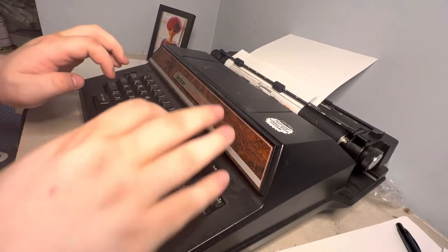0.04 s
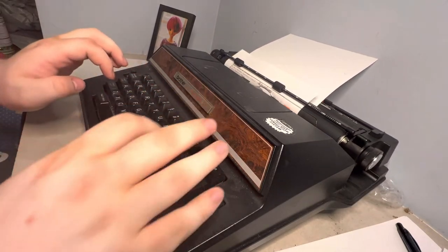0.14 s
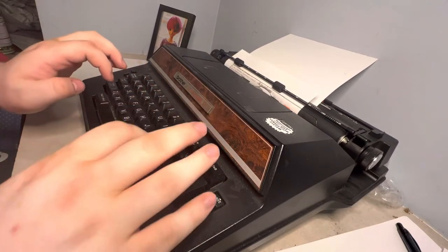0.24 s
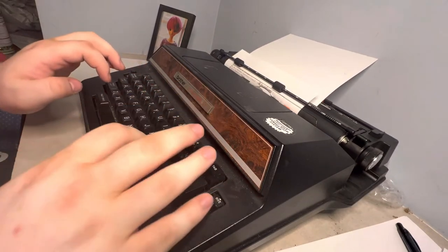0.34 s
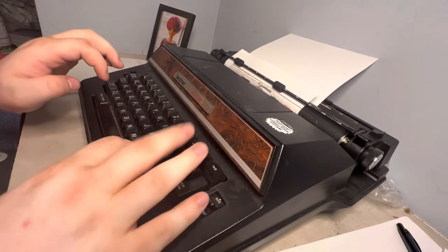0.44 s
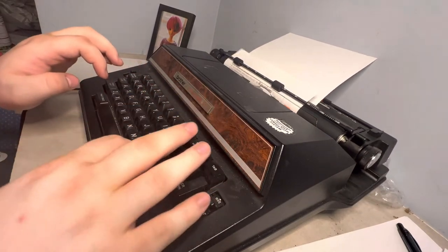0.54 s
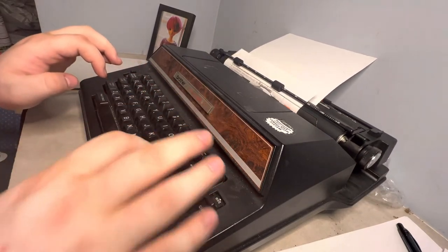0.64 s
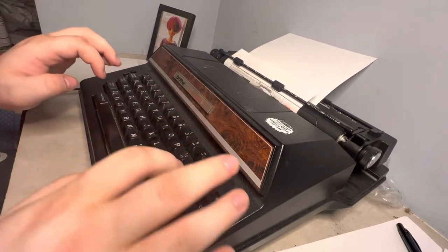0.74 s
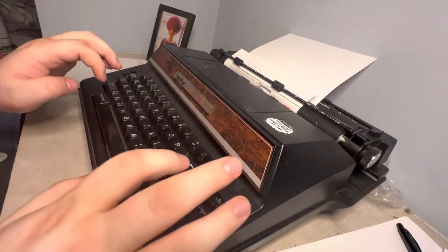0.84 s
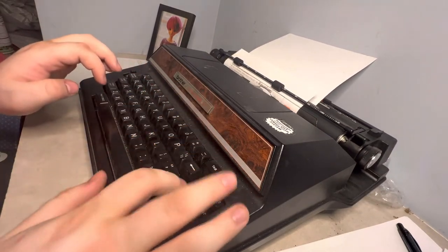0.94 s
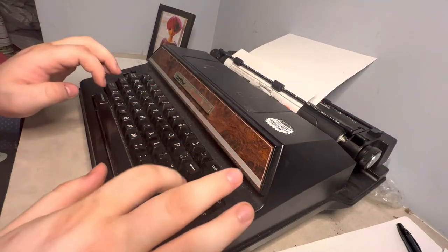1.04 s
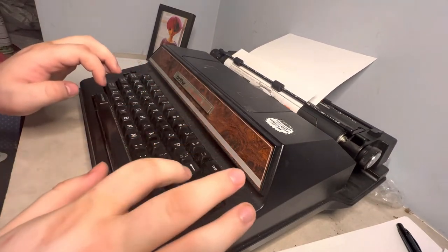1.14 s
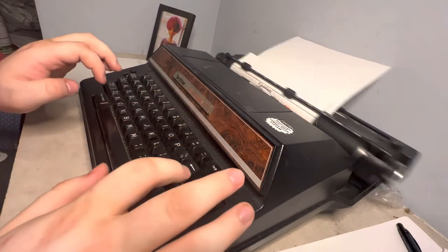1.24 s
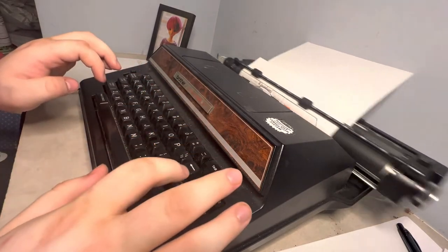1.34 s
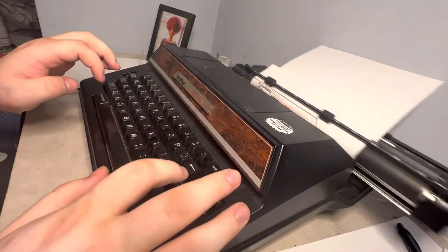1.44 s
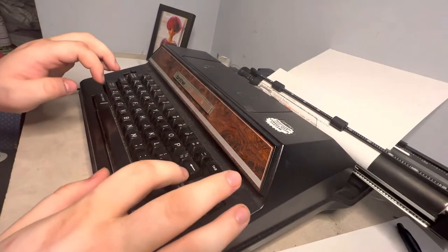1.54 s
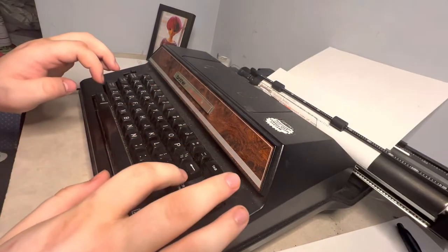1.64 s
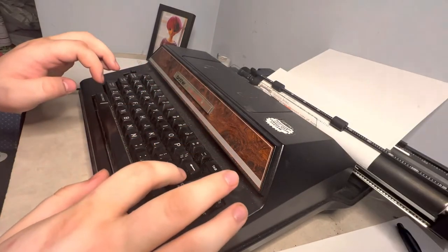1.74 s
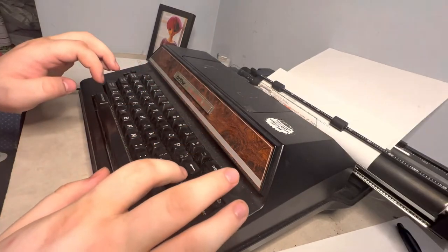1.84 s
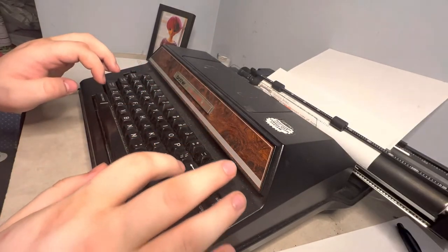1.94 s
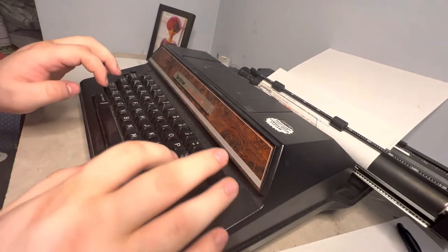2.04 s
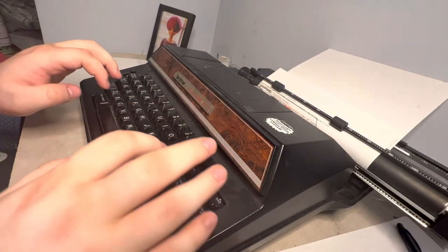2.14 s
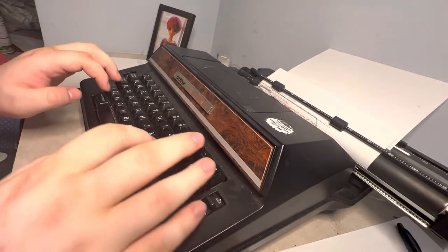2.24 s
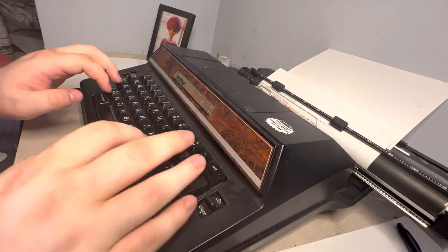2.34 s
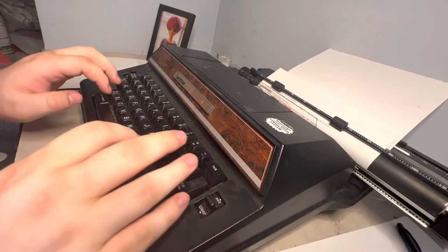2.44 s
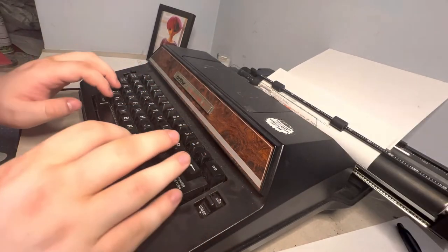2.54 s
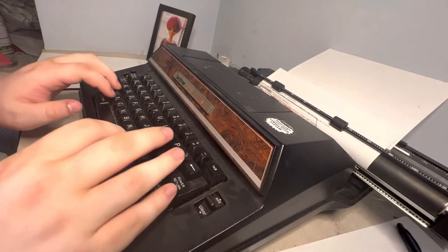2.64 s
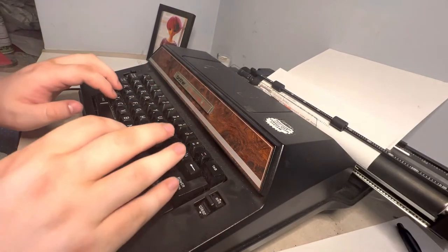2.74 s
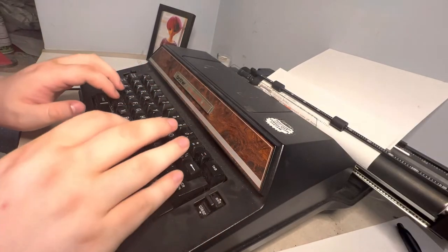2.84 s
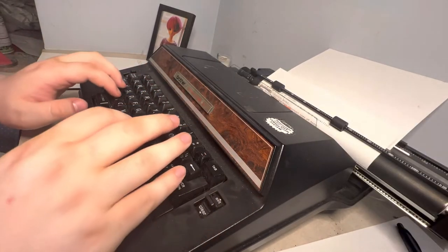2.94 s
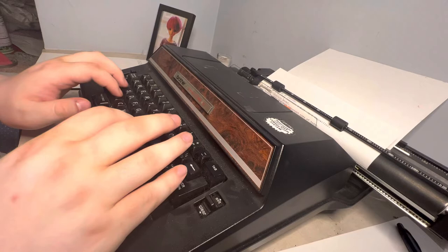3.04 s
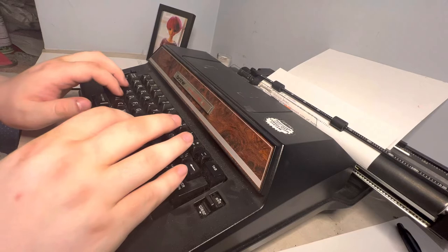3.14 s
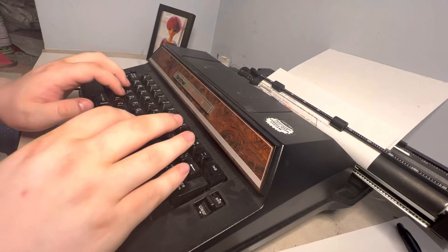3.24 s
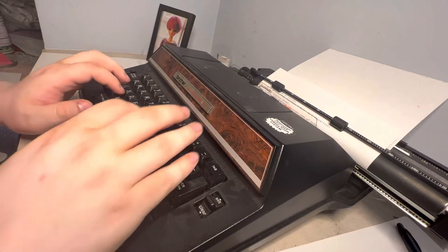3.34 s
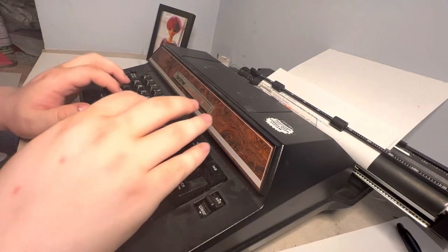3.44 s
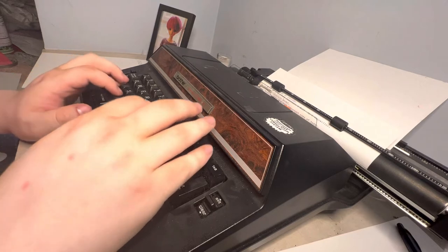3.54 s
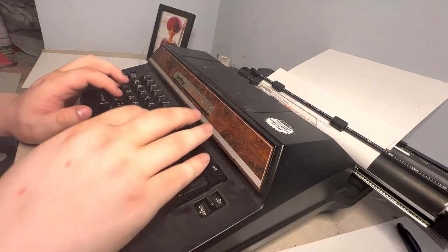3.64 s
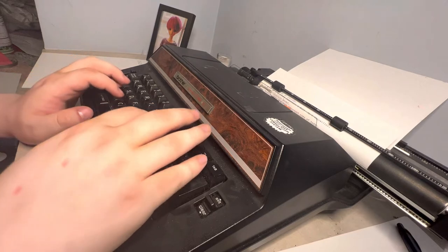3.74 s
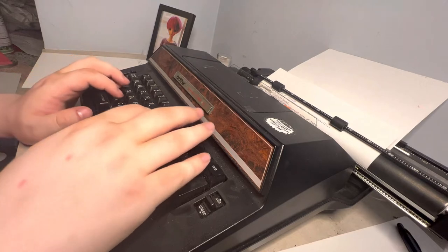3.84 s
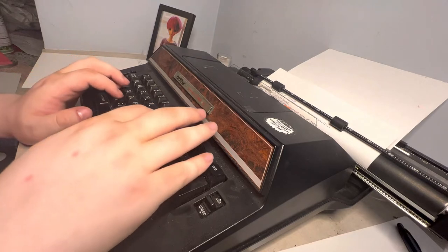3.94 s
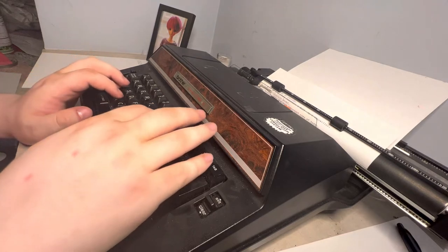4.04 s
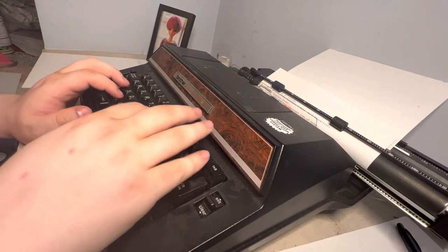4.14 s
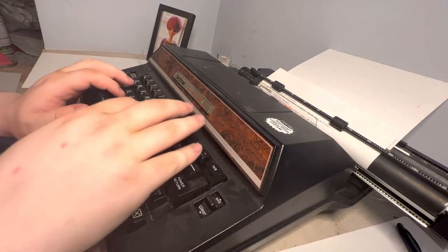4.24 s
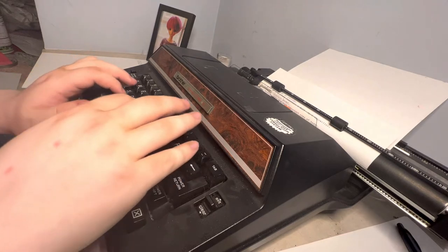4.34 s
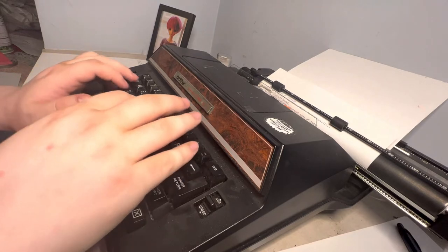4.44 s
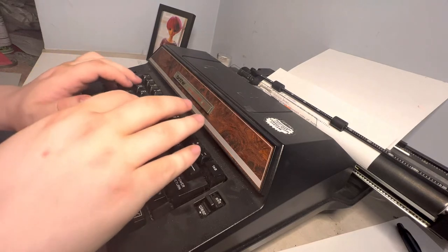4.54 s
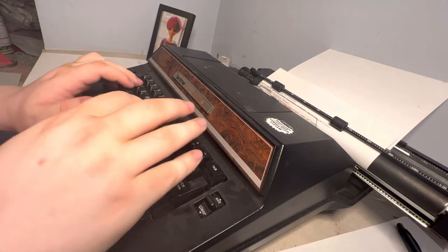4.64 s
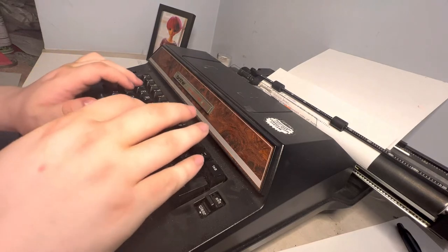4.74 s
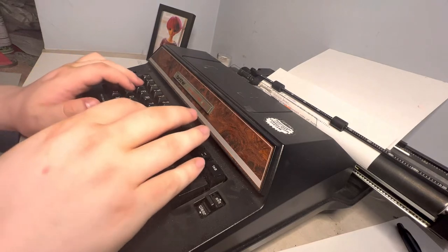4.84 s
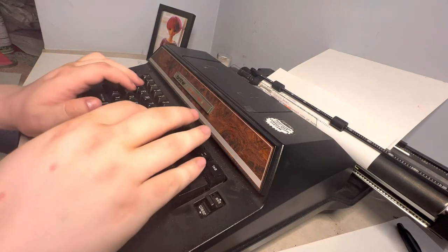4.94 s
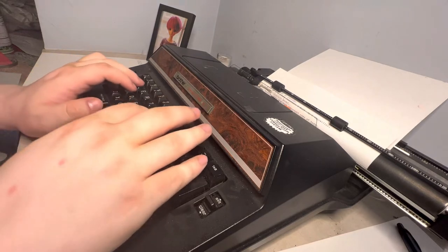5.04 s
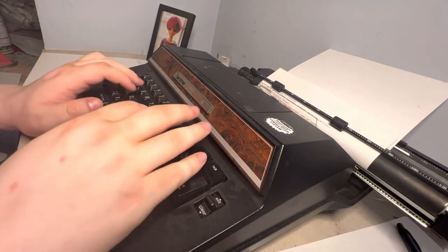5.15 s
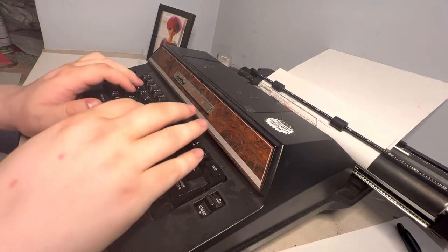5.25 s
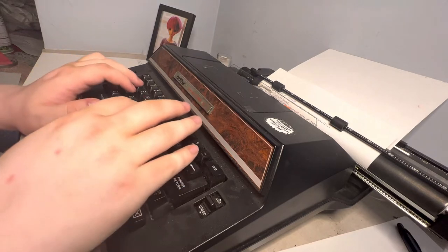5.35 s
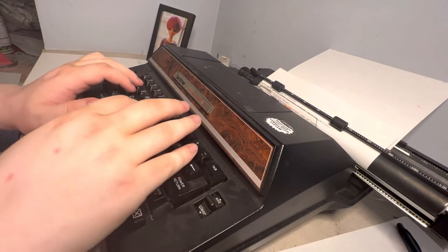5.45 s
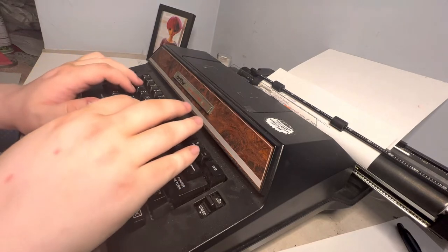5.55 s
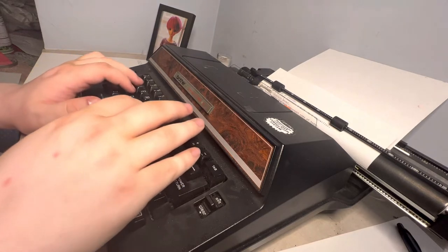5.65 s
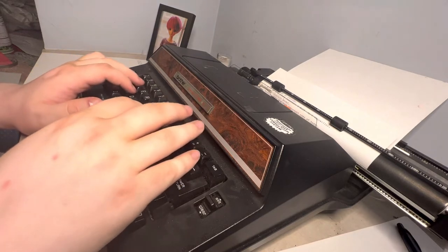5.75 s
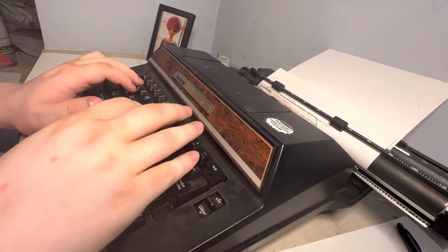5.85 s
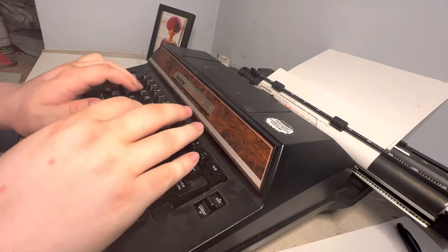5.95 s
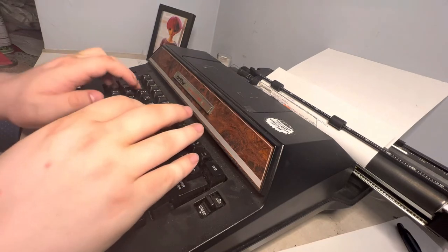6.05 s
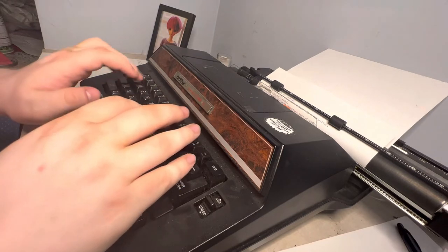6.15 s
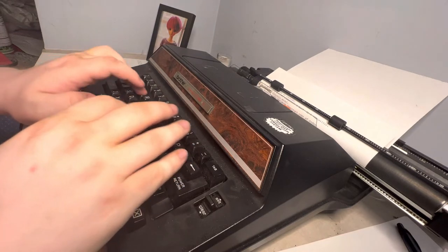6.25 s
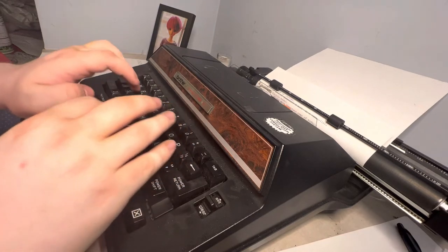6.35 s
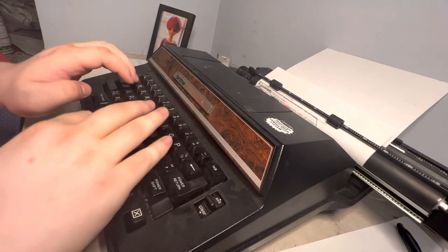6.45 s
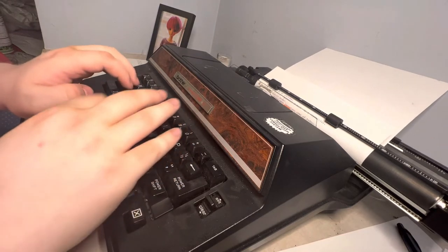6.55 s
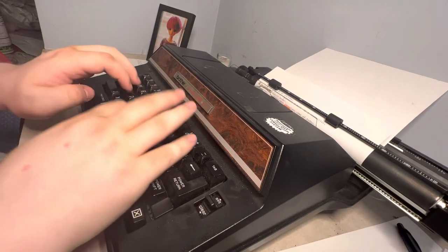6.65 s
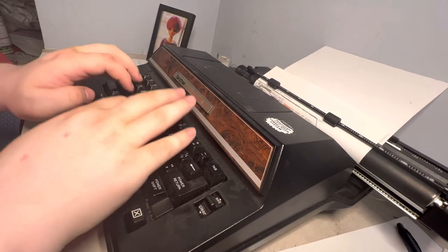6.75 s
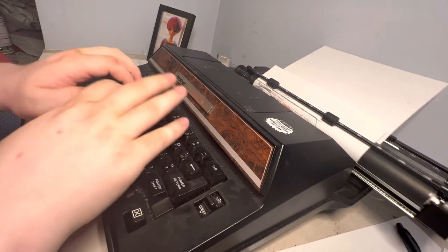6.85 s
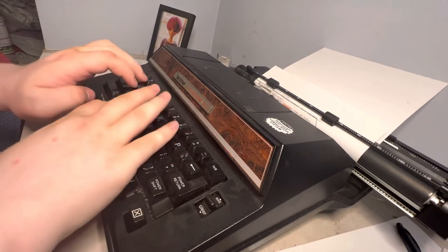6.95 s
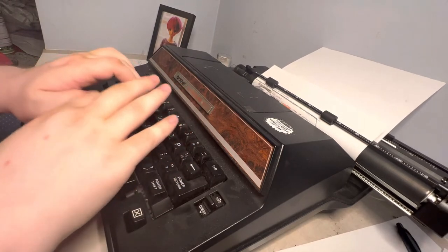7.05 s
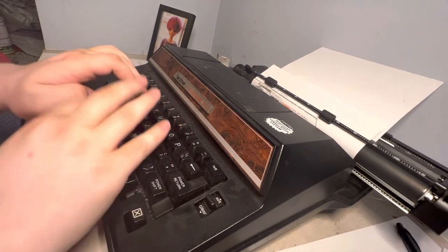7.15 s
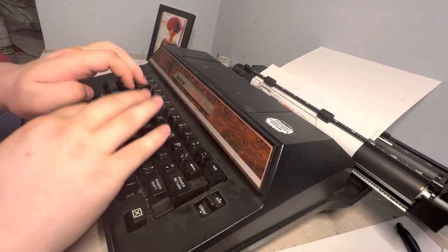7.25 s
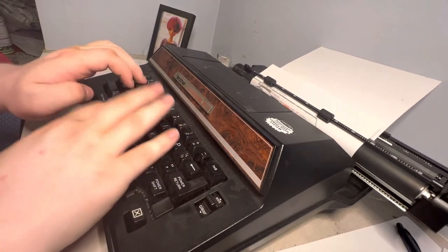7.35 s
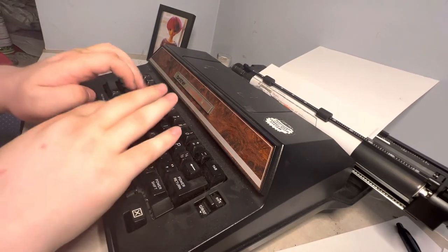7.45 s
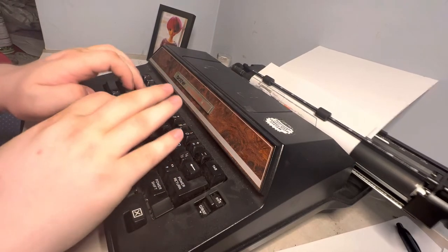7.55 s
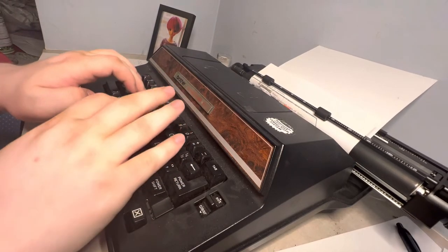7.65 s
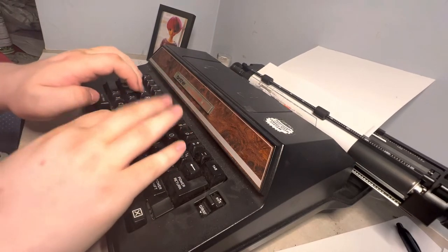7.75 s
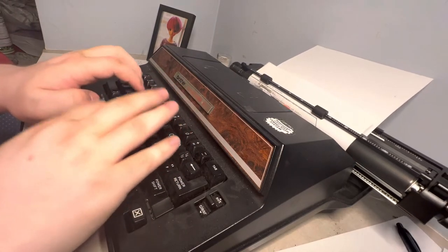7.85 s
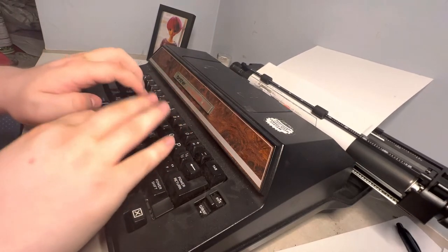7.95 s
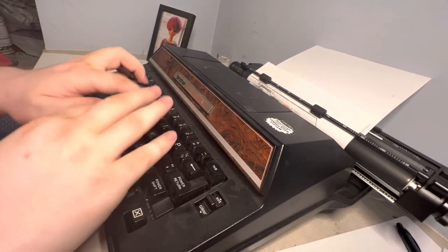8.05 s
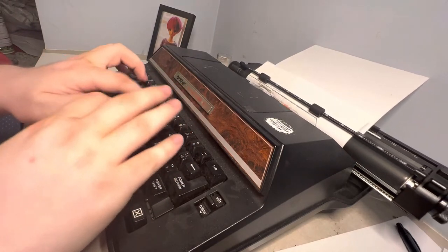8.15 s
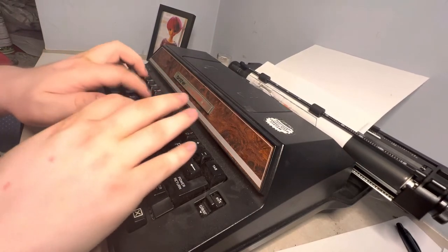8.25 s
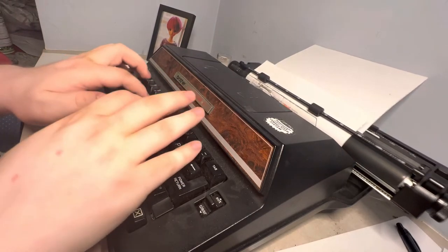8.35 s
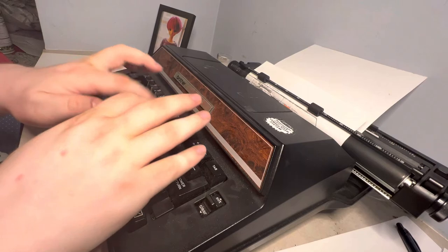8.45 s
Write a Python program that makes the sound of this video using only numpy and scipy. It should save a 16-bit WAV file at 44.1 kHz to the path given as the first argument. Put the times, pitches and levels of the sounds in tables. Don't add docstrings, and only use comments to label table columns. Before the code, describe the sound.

An electric typewriter on a desk in a small room, heard very close in stereo. Its motor hums low and throbbing throughout. One sharp key clack and rattle comes first, then a small ping and a short carriage slide ending in a hard slam. A lone clack follows, a long stretch of hum alone, then a fast uneven run of crisp, metallic letter strikes with desk thumps.

```python
import sys
import numpy as np
from scipy import signal
from scipy.fft import rfft, irfft, next_fast_len
from scipy.io import wavfile
from scipy.ndimage import uniform_filter1d, minimum_filter1d, map_coordinates

SR = 44100
rng = np.random.default_rng(int(sys.argv[2]) if len(sys.argv) > 2 else 0)


def amp(db):
    return 10 ** (np.asarray(db, float) / 20)


def write(x):
    x = np.atleast_2d(x).T
    wavfile.write(sys.argv[1], SR, np.round(np.clip(x, -1, 1) * 32767).astype(np.int16))


N = 375291
T = np.arange(N) / SR


def unit(x):
    return x / np.sqrt(np.mean(x ** 2) + 1e-20)


def along(points, hz):
    f, v = np.transpose(points)
    return np.interp(np.log(hz + 1), np.log(f + 1), v)


def filtered(x, response):
    m = next_fast_len(N + SR // 4)
    return irfft(rfft(x, m) * response(np.fft.rfftfreq(m, 1 / SR)), m)[..., :N]


def body(modes):
    def response(f):
        shape = 0
        for k, (centre, width, db) in enumerate(modes):
            resonance = 1j * f * width / (centre * centre - f * f + 1j * f * width)
            shape = shape + (-1) ** k * amp(db) * resonance
        return shape / np.sqrt(np.mean(abs(shape) ** 2))
    return response


def ringing(modes, t):
    return np.array([amp(db) * np.sin(2 * np.pi * centre * t) * np.exp(-np.pi * width * t)
                     for centre, width, db in modes])


def wobble(rate):
    coarse = T[::8]
    knots = rng.standard_normal(int(N * rate / SR) + 4)
    return np.interp(T, coarse, map_coordinates(knots, [coarse * rate]))


def noise():
    return rng.standard_normal((2, N))


def even(x, span):
    return x / np.sqrt(abs(uniform_filter1d(np.mean(x ** 2, 0), round(span * SR))) + 1e-20)


def clumped(x, depth_db):
    z = signal.stft(x, nperseg=256)[2]
    field = rng.standard_normal(z.shape[1:])
    field = uniform_filter1d(uniform_filter1d(field, size=3, axis=0), size=4, axis=1)
    gain = amp(depth_db * unit(field))
    return signal.istft(z * unit(gain), nperseg=256)[1][:, :N]


def pings(rows, rise, vary):
    out = np.zeros((2, N + SR))
    t = np.arange(round(max(row[2] for row in rows) * SR)) / SR
    luck = rng.standard_normal((len(rows), 4))
    for (s, hz, t60, db), (detune, size, turn, start) in zip(rows, luck):
        phase = 2 * np.pi * hz * (1 + vary / 100 * detune) * t + start + np.c_[[0, turn]]
        level = amp(db + 2 * vary * size - 60 * t / t60) * (1 - np.exp(-t / rise))
        out[:, round(s * SR):][:, :len(t)] += level * np.sin(phase)
    return out[:, :N]


SHAFT_HZ, MAINS_HZ, BELT_HZ = 57.64, 120, 68.65
MAINS_IN_STEP_S, BELT_IN_STEP_S = 4.62, 4.525
WHIRR_DB = -60.5
# order, level_db
SHAFT_ORDERS = [(1, -50), (3, -62.5), (6, -58)]
# freq_hz, level_db (per Hz)
WHIRR_CURVE = [(20, -38), (40, -10.5), (123, 2.5), (170, -19), (285, -16.5), (405, -19), (900, -19.5),
               (1700, -26.5), (1950, -27.5), (3500, -37.5), (5300, -45.5), (9800, -46), (14000, -54.5),
               (16000, -81.5)]
# centre_hz, width_hz, level_db
BEARING_MODES = [(218, 14, 8), (498, 43, -0.5), (663, 13, 0.5), (750, 13, 1.5), (926, 60, 2),
                 (1169, 15, 1.5), (1432, 61, -2.5), (1673, 27, -3.5), (6900, 460, -26)]
# time_s, hum_rise_db, rail_slide_db
RETURN_LOAD = [(1.14, -7, -102), (1.19, 4.5, -34.5), (1.25, 5, -44.5), (1.382, 14, -48),
               (1.44, -7.5, -52.5), (1.47, 10, -47), (1.52, 13.5, -47), (1.6, -4, -96.5)]


def motor():
    def turn(hz, s):
        return np.exp(2j * np.pi * hz * (T - s))

    s, rise_db, _ = np.transpose(RETURN_LOAD)
    hum = sum(amp(db + 2.8 * wobble(22)) * turn(k * SHAFT_HZ, 0) * np.exp(.2j * wobble(7.6))
              for k, db in SHAFT_ORDERS)
    throb = amp(-45.5) + amp(-45.5) * turn(MAINS_HZ - 2 * SHAFT_HZ, MAINS_IN_STEP_S)
    hum += amp(np.interp(T, s, rise_db) + 1.4 * wobble(28)) * throb * turn(2 * SHAFT_HZ, 0)
    hum += amp(-62.0) * turn(SHAFT_HZ, 0) * turn(BELT_HZ - SHAFT_HZ, BELT_IN_STEP_S)
    hum += amp(-68.5 + wobble(8)) * turn(2 * MAINS_HZ, 0)
    whirr = filtered(amp(1.3 * wobble(60)) * noise(), lambda f: amp(along(WHIRR_CURVE, f)))
    whine = filtered(noise(), lambda f: body(BEARING_MODES)(f) * (f < 8000))
    drift_db = .8 * wobble(6)
    hum_pair = np.sqrt(2) * np.array([hum.real, hum.imag])
    return hum_pair + amp(WHIRR_DB + 8.0 + drift_db) * unit(whirr) + amp(WHIRR_DB + 3.0) * unit(whine)


# time_s, level_db
STIR_LEVEL = [(0, -100), (1.2, -60), (1.85, -78), (2.5, -79.5), (2.9, -71.5), (3.3, -78), (4.6, -76.5),
              (4.8, -70), (5.2, -79.5)]
# freq_hz, level_db (per Hz)
STIR_CURVE = [(2500, -42), (4500, -9), (7000, -2.5), (10000, -8.5), (14000, -20.5), (16000, -20.5)]


def stirring():
    rustle = unit(filtered(noise(), lambda f: amp(along(STIR_CURVE, f))))
    tick_s, tick_db, tick_t60 = 4.652, -52, .05
    fade = (T > tick_s) * amp(tick_db - 60 * abs(T - tick_s) / tick_t60)
    tick = fade * unit(filtered(noise(), body([(14000, 1500, 0)])))
    level_db = np.interp(T, *np.transpose(STIR_LEVEL)) + 1.5 * wobble(14) + 1.2 * wobble(6)
    return amp(level_db) * rustle + tick


# trip_s, level_db, spring_db, touch_before_s, touch_db
KEY_TRIPS = [(0.4575, -15.5, -5.5, .012, -27), (3.0136, -16, -3, 0.019, -43),
             (5.8993, -19.5, 1, 0.024, -30.5), (6.2172, -15.5, -3, 0.01, -19),
             (6.6686, -14, 2.5, .012, -23.5), (6.7818, -15.5, -0.5, 0.012, -38),
             (6.9271, -11.5, 1.5, 0.01, -22.5), (7.0603, -14.5, -27, 0.013, -21),
             (7.3682, -12, 0, 0.0062, -28.5), (7.4859, -16.5, -1, 0.013, -25),
             (7.648, -18.5, -2, 0.0085, -17.5), (7.758, -11.5, -0.5, 0.0075, -37),
             (8.0875, -18, -2, 0.017, -18), (8.2828, -16.5, 1.5, 0.0098, -30),
             (8.4862, -17, 2.5, 0.011, -30.5)]
# landing_s, flight_s, cam_db, landing_db, slap_db
TYPED_LETTERS = [(5.95, .032, -9, -18.5, 1.5), (6.2728, .034, -11, -13.5, -3),
                 (6.7277, .032, -11.5, -14, -2), (6.8381, .0335, -8.5, -14, 0), (6.987, .035, -13, -10, 0),
                 (7.1146, .0335, -10, -15, 0.5), (7.428, 0.035, -12.5, -14, 2.5),
                 (7.5407, 0.036, -10.5, -19.5, 0.5), (7.7024, .0335, -10.5, -15, 2.5),
                 (7.8167, .031, -10, -23, -2.5), (8.1367, .033, -11.5, -13.5, -4),
                 (8.343, 0.036, -10, -15, -5.5)]
# delay_s (negative is before), level_db, spring_db, platen_db, snap_db
LETTER_STEPS = [
    (-.011, -19, 0, -1, -12),
    (0, -26, -12, 9, -25),
    (.012, -21.5, -1, -9, -12.5),
    (.032, -19.5, 0, -5.5, -12),
    (.055, -39.5, -17, -9, -15.5),
]
# press_s, level_db
SPACE_BARS = [(6.426, -2), (7.177, -1.5), (7.945, -2)]
# delay_s (negative is before), level_db, spring_db, platen_db, snap_db
SPACE_STEPS = [(-.003, -25, -0.5, -5, -22), (.007, -26.5, -7, -1, -9), (.022, -23.5, 1.5, -3.5, -21),
               (.038, -30.5, -17, -4, -7.5), (0.062, -22, -5, -2.5, -16), (.095, -22.5, -10, -15, -11.5),
               (.139, -35, 1, 6, -12.5)]
# start_s, level_db, spring_db, platen_db, snap_db
RETURN_STEPS = [(0.94, -29.5, 10, 4.5, -25), (0.948, -41, -6.5, 7, -16), (0.959, -49, -22, 17, -7),
                (1.068, -27.5, 4.5, -7, -16), (1.1713, -43, -14, 3.5, -9), (1.192, -36.5, 8, 10, -11.5),
                (1.2175, -43.5, -11, 2, -19.5), (1.287, -34.5, -17, -1.5, -12),
                (1.396, -34.5, -7, -6.5, -22), (1.514, -12, 0, -5, -28), (1.5316, -13, -16, 1.5, -12),
                (1.5467, -20, -18, -9.5, 1), (1.564, -40, -22, -4.5, -9), (1.614, -26, -2.5, -4.5, -21.5)]
# start_s, level_db, spring_db, platen_db, snap_db
BASKET_STEPS = [(0.5275, -30, -13.5, 3.5, -19), (0.6092, -39.5, -3.5, -18, -11), (3.055, -38, -3, 6, -25),
                (3.0728, -17.5, -6.5, -6.5, -8.5), (3.078, -34.5, -11, -17, -17),
                (3.024, -19, -3, -24, -14.5), (3.031, -29, -7, -16, -16), (3.098, -49, -5, -7, -18),
                (3.001, -37, -11.5, 11.5, -21), (1.077, -44, -4, -9, -18), (1.206, -39, -5, 7, -21),
                (4.6512, -42, 3.5, -10, -22), (6.0766, -15.5, 5, -8, -28), (6.1235, -16.5, 2.5, 0.5, -9.5),
                (6.1384, -46, -23, -21, -21), (7.5335, -29, 8, 8, -10), (7.806, -24.5, 7, -6, -12),
                (8.163, -21.5, -16.5, -23, -0.5), (0.455, -27, 6, -15, -8.5), (.478, -18.5, -5, 1, -20.5),
                (.485, -14, -2, -9, -21), (0.514, -13, -3, -4.5, -19.5), (0.5441, -22, -3, -6, -19.5),
                (.5744, -30.5, -1, -7.5, -14.5), (3.009, -24, 6, -18, -24), (5.8912, -23.5, 1, 3, -22)]


def chain():
    touch = 0.85, -4, -29
    trip = -6, -27.5
    cam, landing = (-4.5, -7, -20.5), (-17.5, -6, -20)  # spring, platen and snap dB
    guide_s = .005
    rows = []
    for s, db, spring_db, before, touch_db in KEY_TRIPS:
        rows += [(s - before, touch_db, *touch), (s, db, spring_db, *trip)]
    for s, flight, cam_db, land_db, _ in TYPED_LETTERS:
        rows += [(s - flight, cam_db, *cam), (s - guide_s, land_db, *landing)]
        rows += [(s + later, *rest) for later, *rest in LETTER_STEPS]
    for s, db in SPACE_BARS:
        rows += [(s + later, db + step_db, *rest) for later, step_db, *rest in SPACE_STEPS]
    return rows + RETURN_STEPS + BASKET_STEPS


LAG = 75
SOFTER = .45
HOLD = 1.28
# centre_hz, width_hz, level_db
STEEL_MODES = [(3390, 420, -1.5), (3542, 110, -0.5), (4000, 270, -18), (4720, 60, -3), (5050, 47, -8.5),
               (5900, 83, -1.5), (6300, 150, -2), (7000, 110, -7.5), (5360, 2100, 4.5)]
# centre_hz, width_hz, level_db
SPRING_MODES = [(8060, 300, -0.5), (9120, 480, 5), (9860, 120, 1), (14030, 2800, -7), (8100, 920, -5.5)]
# centre_hz, width_hz, level_db
PLATEN_MODES = [(887, 45, 0), (1574, 230, 6), (1855, 190, -3), (2120, 95, -10.5), (2700, 21, -5.5),
                (1632, 2960, 7.5)]
# level_db, t60_s
ROOM_TAILS = [
    (-9, 0.17),
    (-10, 0.1),
    (-2.5, 0.17),
]


def contacts(rise, t60, scatter_db):
    parts, t = (STEEL_MODES, SPRING_MODES, PLATEN_MODES), np.arange(SR // 8) / SR
    rings = [ringing(modes, t) for modes in parts]
    drive, snaps = np.zeros((3, N + SR)), np.zeros((2, N + SR))
    rows = chain()
    luck = rng.standard_normal((len(rows), 3, 2, 2, 10))
    for (s, db, spring_db, platen_db, snap_db), chance in zip(rows, luck):
        levels, at = amp([db, db + spring_db, db + platen_db]), round(s * SR)
        onset = 1 - np.exp(-t / (rise * amp(-SOFTER * (db + 14.0))))
        burst = onset * amp(-60 * (t / t60) ** HOLD)
        drive[:, at:at + len(t)] += amp(-12.0) * levels[:, None] * burst
        for level, ring, (size, sign) in zip(levels, rings, chance):
            strength = (amp(scatter_db * np.tanh(size)) * np.sign(sign))[:, :len(ring)]
            snaps[:, at + LAG:at + LAG + len(t)] += level * amp(snap_db) * strength @ ring
    sound, chatter = snaps[:, :N], unit(amp(2.6 * wobble(540)))
    for d, modes, (tail_db, tail_t60) in zip(drive[:, :N], parts, ROOM_TAILS):
        keep = amp(-120 / (tail_t60 * SR))
        tail = np.sqrt(abs(signal.lfilter([1 - keep], [1, -keep], d ** 2)))
        direct = d * chatter * noise()
        room = amp(tail_db + 12.5) * tail * noise()
        sound = sound + filtered(direct + room, body(modes))
    return clumped(sound, depth_db=2.4)


# delay_s, pitch_hz, t60_s, level_db
KEY_RINGS = [(.002, 9420, .04, -26), (.003, 3690, .04, -37.5)]
# delay_s, pitch_hz, t60_s, level_db
CAM_RINGS = [(0.0009, 10000, 0.021, -21.5), (0.00031, 7600, .03, -23), (0.0046, 6800, 0.065, -23),
             (.001, 26000, .05, -23.5), (0.008, 5600, 0.013, -27), (0.0034, 1710, .08, -28.5)]
# delay_s, pitch_hz, t60_s, level_db
LANDING_RINGS = [(-.011, 9800, .04, -27.5), (-.005, 5050, 0.059, -23), (.002, 4856, 0.052, -23),
                 (.010, 1673, 0.043, -24), (.030, 4997, 0.062, -27), (.001, 2543, 0.0502, -28.5),
                 (.004, 941, .07, -31), (.031, 5580, 0.062, -29), (.055, 1555, 0.09, -35)]
# delay_s, pitch_hz, t60_s, level_db
SPACE_RINGS = [(0.026, 6880, .07, -31.5), (.062, 4940, 0.065, -28), (.066, 1630, .07, -37)]
# start_s, pitch_hz, t60_s, level_db
ONE_OFF_RINGS = [(6.0795, 6260, 0.041, -19.5), (6.0795, 7250, 0.051, -20.5), (6.0795, 9860, .022, -19),
                 (6.127, 1830, 0.071, -21), (6.127, 3755, 0.067, -22.5),
                 (.483, 5900, 0.051, -22), (.483, 1550, .05, -30.5), (0.514, 9668, 0.063, -28.5),
                (.514, 750, 0.13, -25), (.948, 4100, .05, -39), (.958, 2300, 0.15, -34.5),
                (.966, 866, 0.13, -31.5), (1.074, 6890, .05, -38), (1.076, 4630, 0.043, -36),
                (1.077, 5100, .04, -39), (1.057, 855, 0.065, -38), (1.225, 898, 0.11, -34),
                (1.453, 746, 0.13, -44), (1.08, 9300, .05, -32), (1.187, 980, .06, -42),
                (1.19, 3270, .03, -29), (1.196, 2400, .04, -35.5), (1.2, 1790, 0.057, -25.5),
                (1.212, 1500, 0.067, -28.5), (1.297, 1470, .09, -42), (1.355, 1500, 0.2, -43.5),
                (1.515, 8300, .05, -23.5), (1.516, 1570, 0.12, -21), (1.525, 8936, .05, -26.5),
                (1.53, 862, 0.13, -21), (1.616, 2310, 0.089, -35), (3.022, 8871, .05, -26.5),
                (3.016, 4600, 0.14, -29), (3.018, 1504, 0.047, -37), (3.036, 906, .05, -25.5),
                (6.085, 1370, 0.069, -30), (7.238, 5770, 0.069, -43)]


def part_rings():
    starts = [([k[0] for k in KEY_TRIPS], KEY_RINGS),
              ([s - flight for s, flight, *_ in TYPED_LETTERS], CAM_RINGS),
              ([k[0] for k in TYPED_LETTERS], LANDING_RINGS),
              ([k[0] for k in SPACE_BARS], SPACE_RINGS)]
    repeated = [(s + later, *rest) for times, table in starts for s in times for later, *rest in table]
    return pings(repeated, rise=0.002, vary=1.2) + pings(ONE_OFF_RINGS, rise=0.0017, vary=0)


# start_s, pitch_hz, t60_s, level_db
HARD_CLICKS = [(1.0722, 6300, .008, -28), (1.0775, 4900, .01, -25.5), (1.1915, 3000, .008, -28),
               (1.5475, 6000, .012, -10), (1.6155, 3450, .012, -29), (3.0152, 5200, .01, -21),
               (3.0248, 4607, 0.0087, -19.5), (3.0748, 4930, 0.0091, -21), (3.0795, 3610, .01, -18),
               (4.652, 7100, .03, -48), (2.886, 8500, .01, -55), (2.886, 12800, .008, -54),
               (6.0795, 10430, .012, -11.5), (6.0795, 8900, .015, -13.5), (6.127, 4000, .015, -20),
               (5.8978, 9300, .008, -14), (5.9222, 6610, .012, -12.5), (6.7345, 5126, .008, -18),
               (6.8092, 7000, .012, -15), (6.8505, 4990, .008, -15.5), (6.9282, 8530, .01, -12),
               (6.9552, 6900, .008, -15.5), (7.0155, 8860, .008, -17), (7.3705, 8370, 0.012, -10.5),
               (7.3995, 6790, .01, -16), (7.4385, 4860, .01, -12.5), (7.5128, 6520, 0.011, -13),
               (7.5335, 9820, .01, -14), (7.6745, 6300, 0.0084, -16.5), (7.7605, 8100, .01, -16.5),
               (7.786, 6310, .008, -16),
               (0.4602, 6546, 0.015, -15.5), (0.4604, 8268, 0.015, -17.5), (0.5074, 9646, 0.016, -22),
               (1.5262, 6910, 0.015, -21.5), (1.5574, 6040, 0.017, -14.5), (2.9854, 9000, 0.008, -53),
               (3.015, 13190, 0.015, -21), (5.8937, 10335, 0.015, -25), (6.0068, 1560, 0.015, -20),
               (6.1316, 4478, 0.017, -22), (6.135, 8500, 0.015, -21.5), (6.2122, 11100, 0.015, -23),
               (6.2167, 9310, 0.015, -14), (6.567, 1390, 0.03, -34), (6.6709, 8441, 0.015, -16),
               (6.6919, 1190, 0.015, -23), (6.7007, 6373, 0.015, -16), (6.7064, 1205, 0.015, -21),
               (6.7263, 5005, 0.011, -16), (6.8052, 13092, 0.015, -27), (6.8348, 4990, 0.015, -16),
               (6.965, 8700, 0.015, -23), (7.084, 6460, 0.015, -19), (7.3805, 8340, 0.017, -15.5),
               (7.4376, 6040, 0.015, -19.5), (7.6728, 8441, 0.015, -22), (7.7641, 5820, 0.015, -22),
               (7.7886, 6730, 0.015, -19), (7.8238, 686, 0.015, -14.5), (8.3462, 5480, 0.017, -17.5)]


def hard_knocks():
    return pings(HARD_CLICKS, rise=.0002, vary=0)


# start_s, pitch_hz, t60_s, level_db
DESK_THUDS = [(.482, 152, 0.11, -24), (.528, 154, 0.089, -20.5), (.555, 73.6, 0.16, -17.5),
              (1.56, 111.5, 0.18, -20.5), (3.055, 203, 0.075, -33), (3.098, 218, 0.12, -26.5),
              (1.53, 220, 0.16, -21)]


def desk_thuds():
    return pings(DESK_THUDS, rise=0.0042, vary=0)


# delay_s, housing_db, knock_db, sway_db
JOLTS_OF_LETTER = [
    (-.032, -19.5, -26.5, -32.5),
    (.009, -22, -23, -31.5),
]
# delay_s, housing_db, knock_db, sway_db
JOLTS_OF_SPACE = [(.023, -29.5, -29.5, -31.5), (.065, -35, -37, -41), (.096, -33.5, -38.5, -33)]
# start_s, housing_db, knock_db, sway_db
SINGLE_JOLTS = [(.948, -30, -43, -41), (1.071, -40.5, -49, -39.5), (1.182, -31, -35, -36),
                (1.239, -34, -45, -33), (1.515, -18.5, -26.5, -29.5), (1.549, -24.5, -44, -37),
                (3.019, -26, -36, -45), (3.069, -31, -31, -41), (6.077, -27.5, -41, -48),
                (6.122, -27, -29.5, -37), (0.483, -24.5, -31.5, -36), (0.518, -21.5, -26.5, -34)]


def jolts():
    letters = [(s + later, *rest) for s, *_ in TYPED_LETTERS for later, *rest in JOLTS_OF_LETTER]
    spaces = [(s + later, *np.add(rest, db)) for s, db in SPACE_BARS for later, *rest in JOLTS_OF_SPACE]
    return np.array(letters + spaces + SINGLE_JOLTS)


def jolted(column, peak_s):
    rows, kicks = jolts(), np.zeros(N)
    kicks[np.round(rows[:, 0] * SR).astype(int)] = amp(2 * rows[:, column])
    u = np.arange(SR // 3) / SR / peak_s
    return np.sqrt(abs(signal.fftconvolve(kicks, (u * np.exp(1 - u)) ** 3)[:N]))


# centre_hz, width_hz, level_db
HOUSING_MODES = [(330.4, 18, 0), (475, 32, -4), (658, 5.7, -1), (765, 7.6, 0.5), (1100, 48, -4.5),
                 (702, 800, -10)]
# centre_hz, width_hz, level_db
DESK_MODES = [(100.8, 10, 4.5), (160, 33, -2), (217, 22.4, -2.5), (275, 79, -22.5)]
# centre_hz, width_hz, level_db
LEG_MODES = [(44.7, 18.5, -3.5), (61.84, 20.4, 2), (82, 19, -9.5)]


def frame():
    boom = even(filtered(amp(2.3 * wobble(90)) * noise(), body(HOUSING_MODES)), 0.0093)
    knock = even(filtered(noise(), body(DESK_MODES)), 0.054)
    sway = even(filtered(noise(), body(LEG_MODES)), 0.032)
    lows = amp(-10.0) * jolted(1, peak_s=0.023) * boom
    lows += amp(-2) * jolted(2, peak_s=0.027) * knock
    lows += amp(1.5) * jolted(3, peak_s=0.054) * sway
    return filtered(lows, lambda f: (1j * f / (35 + 1j * f)) ** 3)


# start_s, level_db
PAWL_PINGS = [(.949, -28.5), (1.075, -45)]


def pawl(hz, t60):
    ping = 0
    for s, db in PAWL_PINGS:
        t = np.clip(T - s, 0, None)
        ping = ping + amp(db - 60 * t / t60) * np.sin(2 * np.pi * hz * t)
    return np.array([ping, ping / 2])


# freq_hz, level_db (per Hz)
RAIL_CURVE = [(250, -10), (550, -6.5), (900, 4), (1200, 0.5), (1500, 4), (4960, -2), (8720, -2),
              (11200, -24.5), (14400, -11.5), (16000, -40.5)]


def carriage():
    s, _, slide_db = np.transpose(RETURN_LOAD)
    rough = amp(2.4 * wobble(260) + 1.5 * wobble(40)) * noise()
    slide = filtered(rough, lambda f: amp(along(RAIL_CURVE, f)))
    return amp(np.interp(T, s, slide_db, -200, -200)) * unit(slide)


STOP_S = 1.546
# pitch_hz, level_db, t60_s
STOP_RINGS = [(488.6, -23.5, 0.2), (854, -29.5, 0.15), (1630, -34, 0.17), (5491, -45, .25),
              (6000, -25.5, .22), (6200, -35.5, .14), (7190, -63, 1.2)]


def margin_stop():
    t, at = np.arange(SR) / SR, round(STOP_S * SR)
    start = rng.uniform(0, 2 * np.pi, (len(STOP_RINGS), 2, 1))
    swell = 1 - np.exp(-t / 0.0033)
    ring = 0
    for (hz, db, t60), p in zip(STOP_RINGS, start):
        phase = 2 * np.pi * hz * t + p + 1.7 * wobble(hz / 40)[:SR]
        ring = ring + amp(db - 60 * t / t60) * swell * np.sin(phase)
    return np.pad(ring, ((0, 0), (at, N - at - SR)))


# centre_hz, width_hz, level_db
SLUG_MODES = [(1510, 192, -2.5), (2800, 430, -0.5), (1704, 350, -11), (4900, 900, -12)]


def slaps(attack):
    t, hits = np.arange(SR // 50) / SR, np.zeros(N)
    signs = -(-1.) ** np.arange(len(SLUG_MODES))
    pulse = signs @ ringing(SLUG_MODES, t) * (1 - np.exp(-t / attack))
    for s, *_, db in TYPED_LETTERS:
        hits[round(s * SR) + 22] = amp(db - 6.5)
    return signal.fftconvolve(hits, pulse)[:N] * np.array([[1], [-.62]])


# freq_hz, side_minus_mid_db
WIDTH_CURVE = [(60, -15), (130, -18.5), (200, -10), (300, 5), (600, 0), (1500, 0), (4000, -0.5),
               (9000, 0.5), (11500, 4), (15000, -9.5)]


def scene():
    pair = motor() + stirring()
    pair = pair + contacts(rise=0.0024, t60=0.051, scatter_db=8.0)
    pair = pair + part_rings() + hard_knocks() + desk_thuds() + frame()
    pair = pair + pawl(hz=4970, t60=0.047) + carriage() + margin_stop() + slaps(attack=0.00024)
    mid, side = pair[0], filtered(pair[1], lambda f: amp(along(WIDTH_CURVE, f)))
    return np.array([mid + side, mid - side])


def dip(f, hz, width, depth):
    return 1 - np.clip(depth, 0, 1) * np.exp(-(2 * (f - hz) / width) ** 4)


# from_hz, to_hz, share of time (0-1) in the sum, in the difference
DROPOUT_BANDS = [(5250, 5420, .4, .4), (7520, 7700, .4, .4), (7700, 7860, .4, .4), (10500, 11000, .75, .05),
                 (11000, 11700, .88, .05), (11700, 12400, .45, .5), (12400, 13100, .2, .9),
                 (13100, 14100, .12, .9), (14100, 14800, .2, .8), (14800, 15600, .7, .6),
                 (15600, 17000, .97, .97)]


def starve(pair):
    hz, t, z = signal.stft(pair, SR, nperseg=1024)
    power = np.sum(abs(z[:, hz > 7000]) ** 2, (0, 1))
    calm = power < 6 * np.roll(power, 2)
    fading = power < -minimum_filter1d(-power, 7, origin=3) / 20
    z[:, hz > 12000] *= 1 - .7 * fading
    for lo, hi, *share in DROPOUT_BANDS:
        dice = np.repeat(rng.random((2, len(t) // 5 + 1)), 5, 1)[:, :len(t)]
        z[:, (hz >= lo) & (hz < hi)] *= 1 - ((dice < np.c_[share]) & calm)[:, None]
    return signal.istft(z, SR, nperseg=1024)[1][:, :N]


def top_cut(x):
    return signal.sosfilt(signal.butter(12, 16460, fs=SR, output="sos"), x)


TOP_HZ = 15500
# freq_hz, left_minus_right_db
LEAN_CURVE = [(60, -2.5), (110, -4.5), (200, -5), (380, 6), (700, -2), (1290, 0), (2380, 0), (4400, 7),
              (8120, 5.5), (15000, -7.5)]
# centre_hz, width_hz, depth (0-1)
NARROW_DIPS = [(5330, 180, 0.6), (7700, 350, .7)]


def record(dry):
    def colour(f):
        top = amp(-40 * np.clip((f - TOP_HZ) / 900, 0, 2))
        return dip(f, *NARROW_DIPS[0]) * dip(f, *NARROW_DIPS[1]) * top

    halves = np.array([[.5], [-.5]])
    left, right = filtered(dry, lambda f: colour(f) * amp(along(LEAN_CURVE, f) * halves))
    mid, side = starve(np.array([left + right, left - right]) / 2)
    ports = np.array([mid + side, mid - side])
    ports = ports / (1 + ports ** 4) ** .3
    return top_cut(ports)


dry = scene()
out = record(dry)
write(out)
```